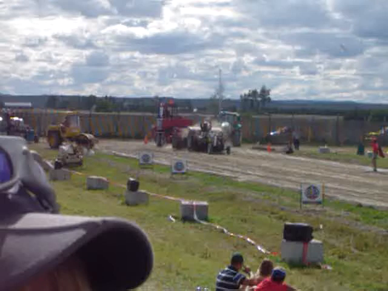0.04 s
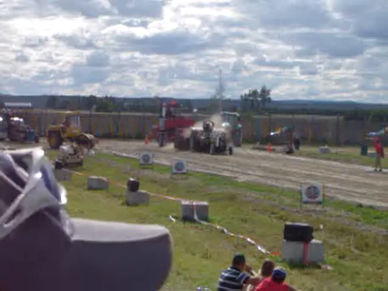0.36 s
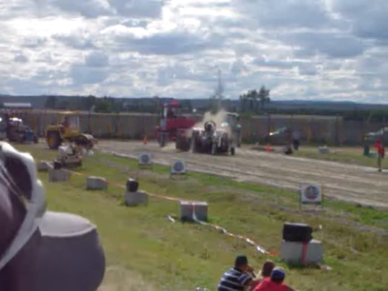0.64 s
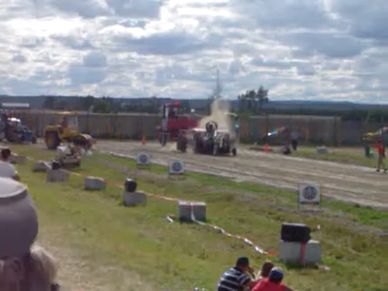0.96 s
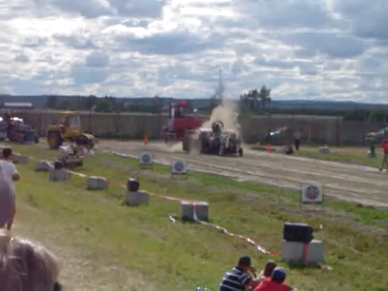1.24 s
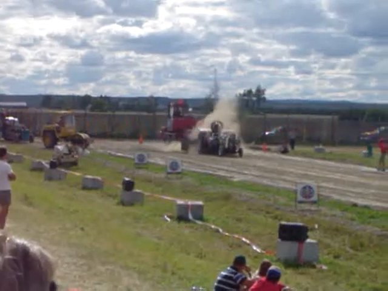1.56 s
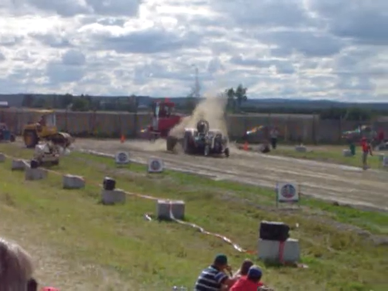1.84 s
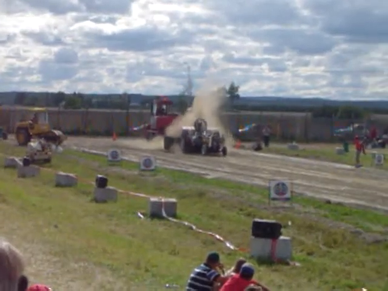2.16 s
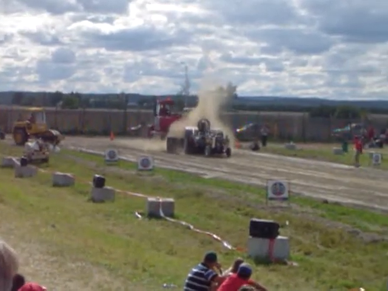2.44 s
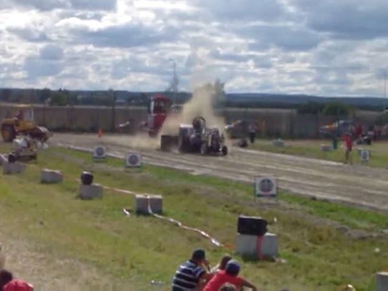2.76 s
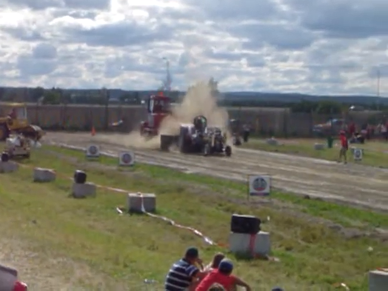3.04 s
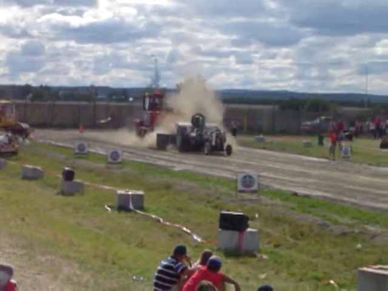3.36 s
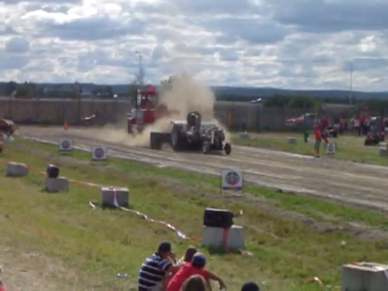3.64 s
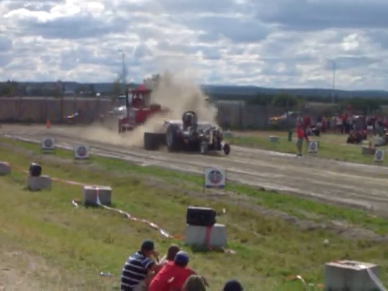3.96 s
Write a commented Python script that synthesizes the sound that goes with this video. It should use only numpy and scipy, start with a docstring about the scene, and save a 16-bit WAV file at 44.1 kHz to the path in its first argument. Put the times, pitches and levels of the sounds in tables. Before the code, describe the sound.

Very loud tractor engines cut in abruptly on an outdoor track, crackling as they rise in pitch. They settle into a steady, raspy roar with a beating supercharger whine, distorted by the overloaded microphone.

```python
"""The supercharged V8 engines of a pulling tractor run at full throttle as it drags a sled over dirt.
The revs climb and level off. Open exhaust pipes fire and crackle inside a roar of gas, and two
blowers (the superchargers) whine and beat against each other.
The sound cuts in abruptly, wavers in the outdoor air and overloads a small microphone."""
import sys
import numpy as np
from scipy import signal
from scipy.fft import rfft, irfft
from scipy.io import wavfile
from scipy.ndimage import uniform_filter1d

SR = 44100
rng = np.random.default_rng(int(sys.argv[2]) if len(sys.argv) > 2 else 0)


def digitize_waveform(pressure):
    """Quantize a signal to 16-bit integers and store it at the path in sys.argv[1].

    Rows of a 2-D input are taken as channels; values are limited to [-1, 1].
    """
    field = np.atleast_2d(pressure).T
    bounded = np.clip(field, -1, 1)
    quanta = np.round(bounded * 32767).astype(np.int16)
    wavfile.write(sys.argv[1], SR, quanta)


N = 176400
T = np.arange(N) / SR


def exhaust(speed, cycles):
    """Unevenly spaced firings make tones at multiples of the cycle rate; one blower tone joins them."""
    # The seven strongest tones, named by their multiple, swell and fade: t/s, level/dB
    tone_5 = [(.12, -34.5), (.7, -32.5), (.92, -38), (1.7, -45), (2.03, -32), (2.45, -34), (3.25, -29),
              (3.65, -36), (3.9, -29)]
    tone_8 = [(.12, -28), (.38, -34), (.66, -23), (1, -28), (2.3, -32), (2.95, -30), (3.3, -34.5)]
    tone_10 = [(.12, -40), (.55, -32), (1, -38), (2.3, -32), (3.3, -27.5), (3.65, -40)]
    tone_12 = [(.12, -34), (.7, -48), (.95, -30), (2.2, -30.5), (2.55, -24.5), (2.85, -31), (3.85, -27)]
    tone_14 = [(.12, -40), (.82, -25.2), (1.6, -29), (2.1, -27.5), (3.92, -39)]
    tone_15 = [(.12, -31), (.42, -37), (.68, -23.8), (1, -28), (1.45, -30.5), (1.95, -37), (2.45, -28.5),
               (2.9, -32), (3.92, -28.5)]
    tone_20 = [(.12, -31), (.4, -35), (.52, -25), (.78, -25), (1.3, -48), (2.4, -30), (3.4, -31),
               (3.7, -44)]
    strong = {5: tone_5, 8: tone_8, 10: tone_10, 12: tone_12, 14: tone_14, 15: tone_15, 20: tone_20}
    # Weaker tones, by multiple: level at low revs/dB, level at full revs/dB
    # Up to 26 they are exhaust; 37 is a whine near 2 kHz where the two blowers' tones combine.
    weak = {1: (-63, -47), 2: (-51, -51.5), 3: (-39, -42), 4: (-70, -46), 6: (-30.5, -45), 7: (-48, -33.5),
            9: (-47, -32), 11: (-35.5, -34), 13: (-31.5, -37.5), 16: (-37, -38), 17: (-47, -29.5),
            18: (-42, -38), 19: (-38, -42), 21: (-33, -33), 22: (-32.5, -40), 23: (-31.5, -35),
            26: (-31.5, -35), 37: (-48, -31)}
    # The rasp made by all the other multiples: f/Hz, level/dB
    rasp = [(900, -31), (1500, -38), (2400, -34.5), (3500, -46), (6000, -63)]
    revs = rev_fraction(speed)
    sound = np.zeros(N)
    for multiple in range(1, 73):
        average_hz = multiple * speed.mean()
        waver = 0.4 + 0.58 * (average_hz / 1000) ** 2  # the air shakes high tones most
        if multiple in strong:
            db = 1.2 + over_time(strong[multiple])
            waver = 0.12 + 0.28 * revs  # strong tones are steadier
        elif multiple in weak:
            low_db, full_db = weak[multiple]
            db = 0.5 + low_db + (full_db - low_db) * revs
        else:
            db = level_at(rasp, average_hz) + rng.uniform(-np.sqrt(3), np.sqrt(3))
        sound += gain(db) * wavering_tone(multiple * cycles, waver, waver_hz=7.4)
    return sound


def gas_roar(cycles, cylinders=8):
    """Swirling gas puffs out with each firing; its tone drifts on the way through the air."""
    # Overall shape of the roar: f/Hz, relative level/dB
    shape = [(20, -37), (60, -16), (120, -18.5), (220, -13.5), (400, -8.5), (700, -4), (1200, -3),
             (1700, -1), (2700, -2), (3500, -1.5), (4500, -6), (6200, -8), (7200, -10.5), (10000, -22.5)]
    # Centres of the bass, middle, upper middle and treble bands: f/Hz
    band_hz = [70, 600, 2400, 6000]
    # How each band rises and falls: t/s, bass/dB, middle/dB, upper middle/dB, treble/dB
    band_changes = [(0, -6, -7, -3.5, -1), (.45, -2, -3.5, -0.5, -1.5), (.8, -12, 1, -1, 0.5),
                    (1.5, -5, -2.5, 1, 0.5), (2, -1, -0.5, 1.5, 0.5), (2.5, -7, 1.5, 3.5, -3),
                    (2.9, -3, 0, 3, -2), (3.3, -8, -0.5, 1, 0.5), (4, 3, 1.5, 1.5, -1)]
    firing_pulse = 0.089 * np.cos(2 * np.pi * cylinders * cycles)
    crank_pulse = 0.11 * np.cos(2 * np.pi * 2 * cycles)
    puffs = rng.standard_normal(N) * (1 + firing_pulse + crank_pulse)
    flutter_db = 0.5 * normalise(drift(hz=25).real)
    gas = normalise(puffs * gain(flutter_db))
    # Split the noise into a grid of frequency and time, and set the level of each cell.
    hz, frame_times, grid = signal.stft(gas, SR, nperseg=1024, noverlap=768)
    times, *bands = np.transpose(band_changes)
    frames = np.transpose([np.interp(frame_times, times, band) for band in bands])
    change_db = np.transpose([np.interp(np.log(hz + 1), np.log(band_hz), row) for row in frames])
    patches = uniform_filter1d(rng.standard_normal(grid.shape), size=10, axis=0)
    patch_db = 0.49 * normalise(uniform_filter1d(patches, size=14, axis=1))
    grid = grid * normalise(gain(level_at(shape, hz)))[:, None]
    grid = grid * gain(-11 + change_db + patch_db)
    return signal.istft(grid, SR, nperseg=1024, noverlap=768)[1][:N]


def blower_whine(cycles):
    """Two superchargers, geared slightly apart, whine at nearly the same pitch and so beat."""
    # Tones at 2, 3 and 4 times the rotor's speed: t/s, tone 2/dB, tone 3/dB, tone 4/dB
    levels = [(0, -47, -50, -48), (1.05, -31, -45, -39), (1.35, -32, -45, -36), (1.6, -25.5, -40, -26),
              (1.95, -30, -40, -27), (2.35, -24, -37, -25), (2.75, -22.5, -36, -22.5),
              (3.05, -28, -36, -24.5), (3.42, -28.5, -25, -30.5), (4, -27, -26.5, -31)]
    # Each blower's gearing and level offsets: turns per engine cycle, tone 2/dB, tone 3/dB, tone 4/dB
    blowers = [(9.14, .5, -2.5, 2), (9.34, 0, 1.5, -1.5)]
    sound = np.zeros(N)
    for gearing, *offsets in blowers:
        for column, offset_db in enumerate(offsets, 1):
            tone = wavering_tone((column + 1) * gearing * cycles, waver=0.36, waver_hz=16)
            sound += gain(offset_db + over_time(levels, column)) * tone
    return sound


def crackle(speed, shocks_per_s=1500, band_hz=(1210, 4400)):
    """Small shock waves leave the open pipes at random, hardest while the engine strains at low revs."""
    shocks = (rng.random(N) < shocks_per_s / SR) * rng.exponential(1, N)
    band = signal.butter(1, band_hz, "bandpass", fs=SR)
    db = -16.5 - 11 * rev_fraction(speed)
    return -gain(db) * normalise(signal.lfilter(*band, shocks))


def reflections(sound):
    """Sound bouncing off the ground and nearby surfaces lifts some frequencies and weakens others."""
    # Peaks and dips on the way to the microphone: f/Hz, half width/Hz, level/dB
    peaks = [(780, 45, -2), (1230, 70, -2.5), (1640, 110, 1.5), (1870, 70, -4), (2050, 90, 1.5),
             (2680, 100, 1), (7200, 400, -2.5)]
    hz = np.fft.rfftfreq(N, 1 / SR)
    boost_db = sum(db * np.exp(-((hz - centre) / width) ** 2) for centre, width, db in peaks)
    return irfft(rfft(sound) * gain(boost_db), N)


def rev_fraction(speed, low_hz=37.3, full_hz=55.3):
    """0 at low revs, 1 at full revs."""
    return np.clip((speed - low_hz) / (full_hz - low_hz), 0, 1)


def wavering_tone(periods, waver, waver_hz):
    """A tone whose strength and phase wander; periods counts its vibrations so far."""
    shake = (1 + waver * drift(waver_hz)) / np.sqrt((1 + waver ** 2) / 2)
    angle = 2 * np.pi * (periods + rng.random())
    return shake.real * np.cos(angle) - shake.imag * np.sin(angle)


def drift(hz, size=2048):
    """A slow random wobble in complex numbers, mostly slower than hz."""
    noise = rng.standard_normal(size) + 1j * rng.standard_normal(size)
    rates = np.fft.fftfreq(size, N / SR / size)
    wobble = normalise(np.fft.ifft(noise / (1 + (rates / hz) ** 2)))
    return np.interp(T, np.linspace(0, N / SR, size), wobble)


def gain(db):
    """Turns decibels into a multiplier."""
    return 10 ** (np.asarray(db) / 20)


def normalise(x):
    """Scales a signal to an average power of 1."""
    return x / np.sqrt(np.mean(abs(x) ** 2) + 1e-20)


def over_time(table, column=1):
    """Reads one column of a time table at every sample."""
    columns = np.transpose(table)
    return np.interp(T, columns[0], columns[column])


def level_at(table, hz):
    """Reads a table of levels along a logarithmic frequency axis."""
    table_hz, db = np.transpose(table)
    return np.interp(np.log(hz + 1), np.log(table_hz), db)


def low_pass(x, hz):
    """Steeply cuts the treble above hz."""
    return signal.oaconvolve(x, signal.firwin(511, hz, window=("kaiser", 8), fs=SR), "same")


def scene():
    """Engine speed drives the exhaust, the blowers, the roar and the crackle."""
    # Engine speed, where one cycle is two turns of the crank: t/s, cycle rate/Hz
    engine_speed = [(.13, 37.9), (.31, 39.2), (.55, 43.2), (.78, 45.6), (.98, 48.6), (1.15, 50),
                    (1.29, 50.4), (1.5, 52.7), (1.7, 53.8), (1.92, 54.2), (2.1, 55), (2.38, 54.6),
                    (2.83, 56.5), (2.96, 55.8), (3.36, 57.3), (3.6, 56.5), (4, 55.95)]
    speed = over_time(engine_speed)
    jitter = 1 + 0.00081 * drift(hz=13.5).real
    cycles = np.cumsum(speed * jitter) / SR
    tractor = exhaust(speed, cycles) + blower_whine(cycles) + gas_roar(cycles) + crackle(speed)
    return reflections(tractor)[None]


def record(dry, start_s=0.0776, fade_in_s=0.0048):
    """The overloaded microphone squashes the wave; the sound is then cut above 10 kHz and clipped."""
    sound = dry[0] * gain(1.85)
    ceiling = np.where(sound > 0, 0.57, 0.83)  # upward swings are squashed harder
    sound = ceiling * np.tanh(sound / ceiling)
    fade_in = np.clip((T - start_s) / fade_in_s, 0, 1)
    sound = low_pass((sound - sound.mean()) * fade_in, hz=10137)
    return low_pass(np.clip(sound, -0.69, 0.69), hz=15800)[None]


dry = scene()
out = record(dry)
digitize_waveform(out)
```